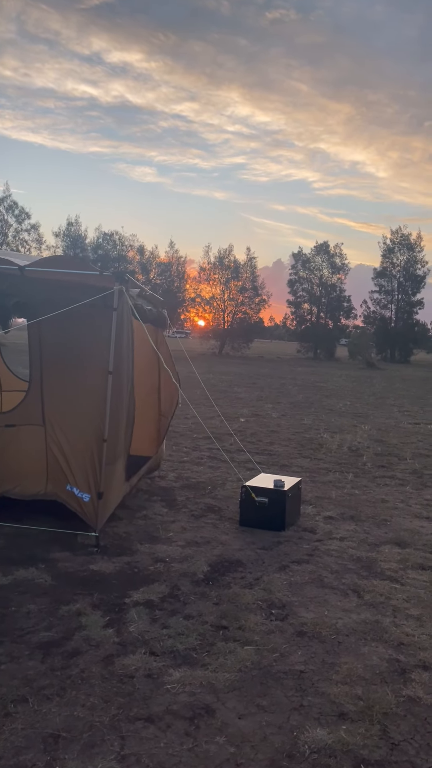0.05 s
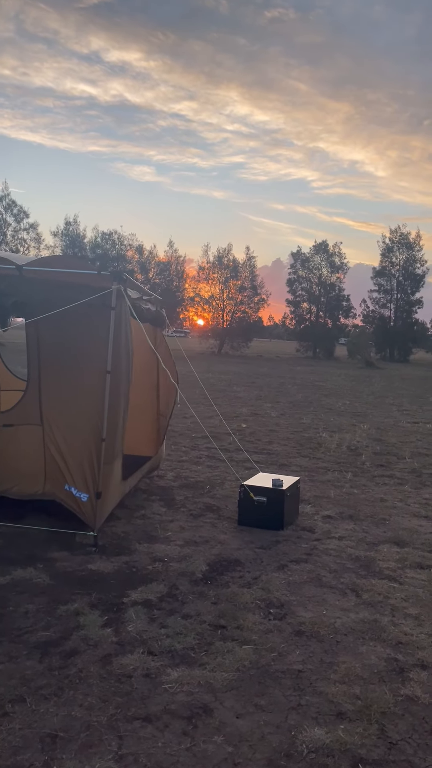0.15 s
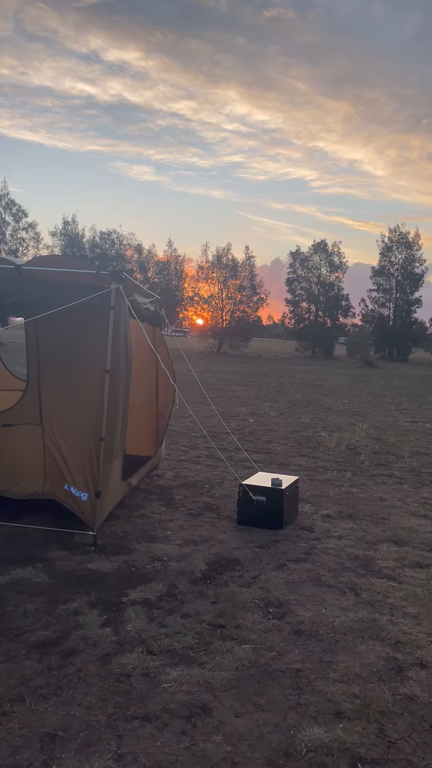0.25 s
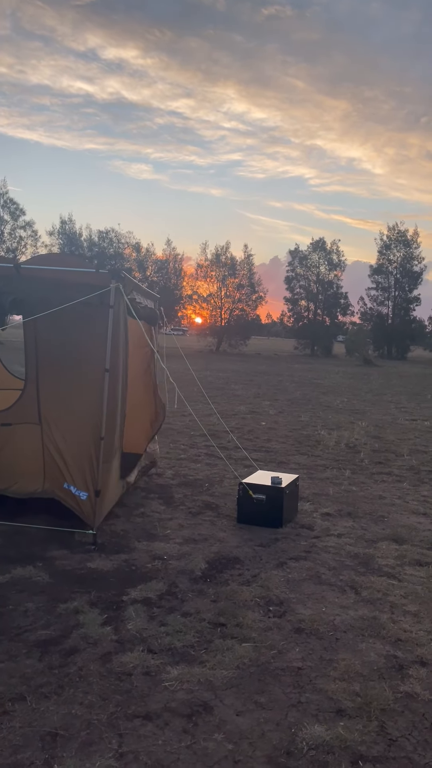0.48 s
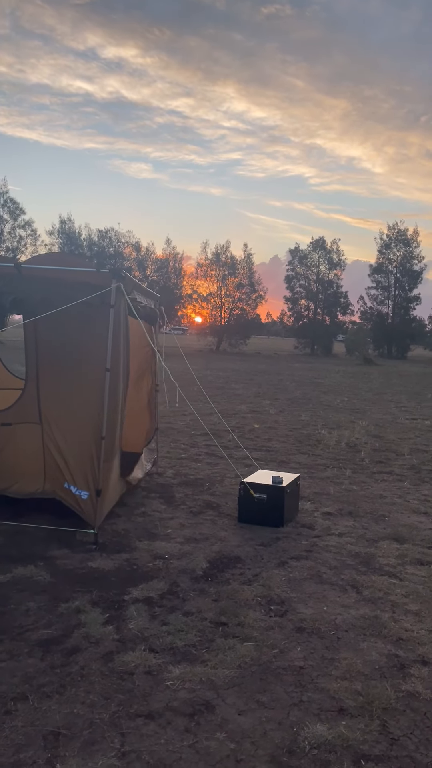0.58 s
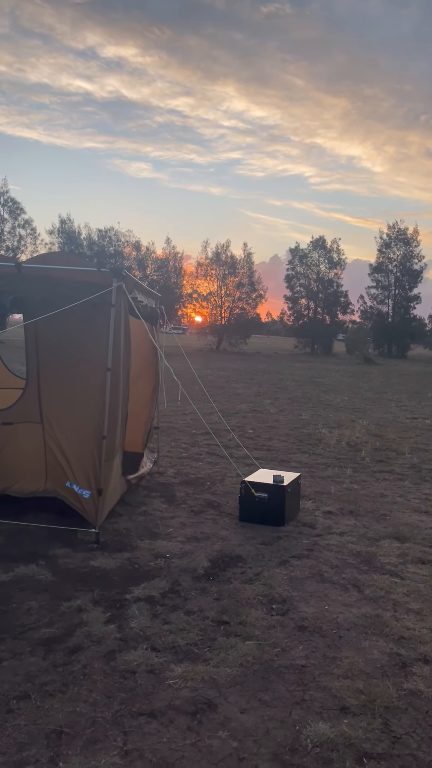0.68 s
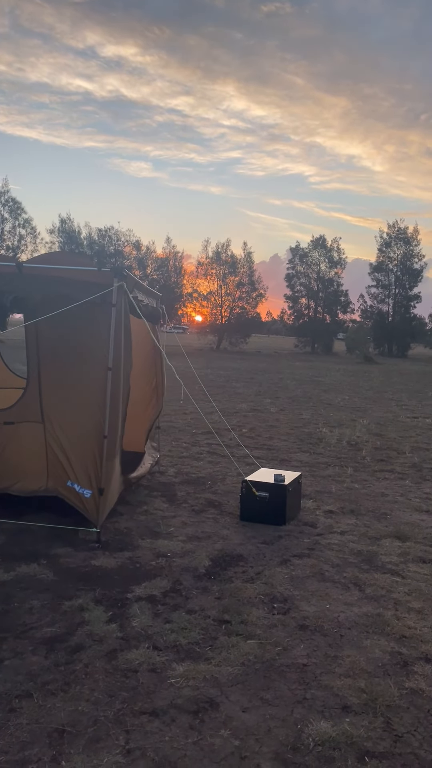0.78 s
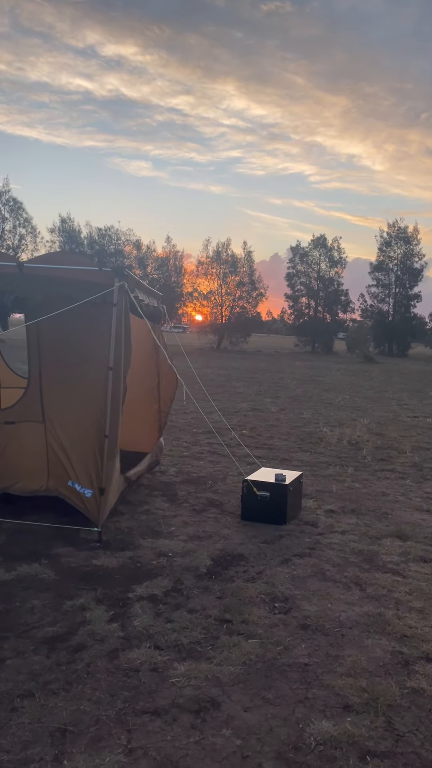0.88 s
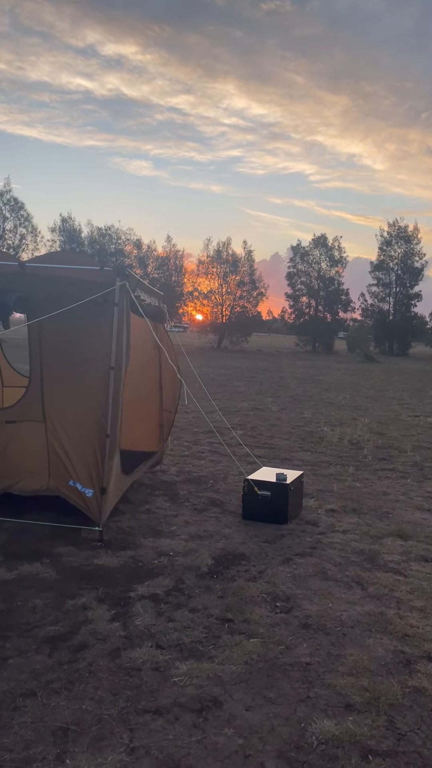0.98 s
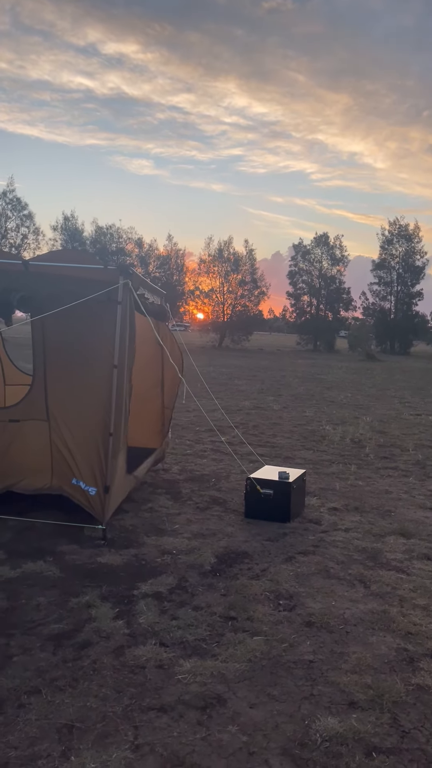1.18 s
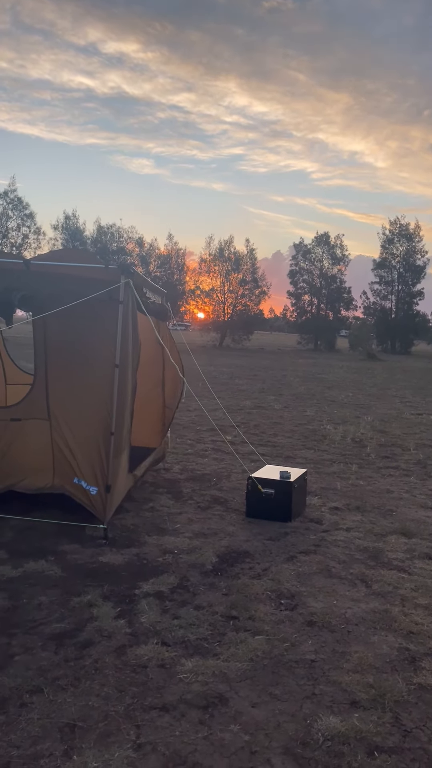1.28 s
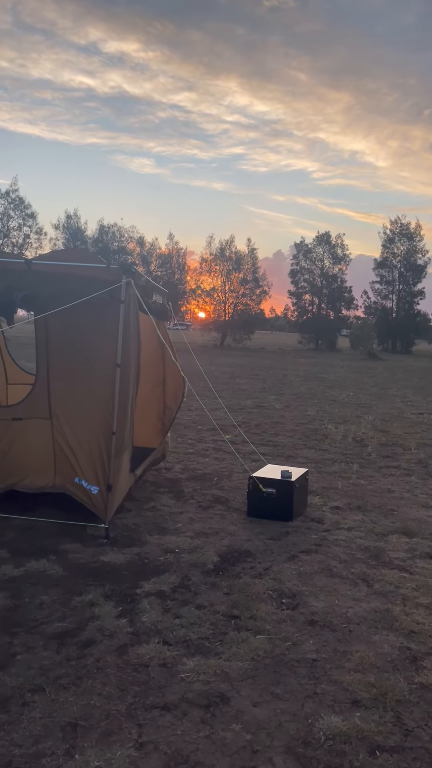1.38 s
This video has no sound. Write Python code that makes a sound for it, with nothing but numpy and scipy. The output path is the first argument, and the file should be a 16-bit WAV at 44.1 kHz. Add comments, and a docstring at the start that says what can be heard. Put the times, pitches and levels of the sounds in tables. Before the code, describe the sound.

A tent wall flaps close by, loudest at about 0.25 seconds, with snapping creases and a low thump. It rustles around 0.55 seconds, flaps again more briefly at 0.8 just after a tiny tick, then rustles lightly until 1.2. Low wind rumbles in gusts throughout, easing after one second. Behind it are a faint distant rush, a soft hiss and a few very faint bird chirps and insect pips.

```python
"""Tent in a light wind at dawn

On an open field a loose tent wall flaps twice: folds ripple through it, creases snap and
the panel pulls taut with a low thump. It rustles in between. Wind rumbles over a far-off rush
and a faint hiss; a bird and an insect call faintly off a tree line, and something ticks once."""
import sys
import numpy as np
from scipy import signal
from scipy.fft import rfft, irfft
from scipy.io import wavfile
from scipy.ndimage import uniform_filter1d

SR = 44100
rng = np.random.default_rng(int(sys.argv[2]) if len(sys.argv) > 2 else 0)


def pcm_store(signal):
    """Save signal as 16-bit PCM."""
    levels = np.round(np.clip(np.atleast_2d(signal), -1, 1) * 32767)
    wavfile.write(sys.argv[1], SR, levels.astype(np.int16).T)


N = 63945


def undb(db):
    return 10 ** (np.asarray(db) / 20)


def unit(x):
    """Scale to rms 1."""
    return x / np.sqrt(np.mean(x ** 2) + 1e-30)


def clock():
    return np.arange(N) / SR


def stereo(mid, side):
    return np.array([mid + side, mid - side])


def colour(x, spectrum):
    """Minimum-phase filter from (freq_hz, gain_db) points; -18 dB/octave above the last."""
    hz, db = np.array(spectrum, float).T
    f = np.maximum(np.arange(N + 1) * SR / (2 * N), 1)
    outline_db = np.interp(np.log(f), np.log(hz), db) - 18 * np.log2(np.maximum(f / hz[-1], 1))
    cepstrum = irfft(np.log(undb(outline_db)))
    cepstrum[1:N] *= 2
    cepstrum[N + 1:] = 0
    return irfft(rfft(np.tile(x, 2)) * np.exp(rfft(cepstrum)))[N:]


def noise(spectrum):
    """Coloured noise, rms 1."""
    return unit(colour(rng.standard_normal(N), spectrum))


def lowpass(x, cutoff_hz):
    return signal.sosfilt(signal.butter(5, cutoff_hz, fs=SR, output="sos"), x)


def even(x, span_s):
    """Hold the local rms at 1."""
    return x / np.sqrt(uniform_filter1d(x ** 2, max(int(span_s * SR), 2)) + 1e-18)


def drift(rate_hz):
    """Smooth random motion, rms 1."""
    hold = max(int(SR / rate_hz), 1)
    steps = np.repeat(rng.standard_normal(N)[:N // hold + 1], hold)
    return unit(uniform_filter1d(steps, hold)[:N])


def burst(peak_s, rise_s, fall_s):
    """Gaussian rise, exponential fall."""
    t = clock() - peak_s
    return np.exp(-np.where(t < 0, (t / rise_s) ** 2, t / fall_s))


def contour(points):
    """Gain curve through (time_s, level_db) points."""
    return undb(np.interp(clock(), *np.array(points).T))


# Hiss spectrum: freq_hz, gain_db
HISS_SPECTRUM = [(1500, -2.5), (2500, 0.5), (3500, 1.5), (4500, 1), (5700, 3.5), (7000, -4), (8500, -0.5),
                 (9800, 3.5), (11800, -5), (12800, -12.5), (13500, -26.5)]

def hiss(level_db=-78, side_db=-1):
    """Faint, wide hiss of the field."""
    return undb(level_db) * stereo(noise(HISS_SPECTRUM), undb(side_db) * noise(HISS_SPECTRUM))


# Rush spectra (mid, side, body): freq_hz, gain_db
RUSH_MID_SPECTRUM = [(100, -14), (250, -22.5), (430, -20.5), (600, -9), (790, 3), (930, -1), (1100, -3),
                     (1330, -6), (1600, -26), (2100, -32.5), (3200, -50.5)]
RUSH_SIDE_SPECTRUM = [(600, -42), (760, -5), (900, -4), (1270, -2), (1440, -7), (1600, -25), (2000, -27),
                      (3000, -28), (4000, -44.5)]
RUSH_BODY_SPECTRUM = [(200, -27), (380, -8.5), (520, -0.5), (750, 1), (1000, -3), (1400, -22)]
# Swell of the body: time_s, level_db
BODY_SWELL = [(0, -75), (.45, -78.5), (.95, -72.5), (1.25, -65), (1.45, -65.5)]

def far_rush(level_db=-59, flicker_db=1.54, side_db=-8.5):
    """Flickering far-off rush, wider toward its top; slowly gains body."""
    mid = noise(RUSH_MID_SPECTRUM) * undb(flicker_db * drift(rate_hz=59.96))
    side = undb(side_db) * noise(RUSH_SIDE_SPECTRUM)
    body = noise(RUSH_BODY_SPECTRUM) * contour(BODY_SWELL)
    return undb(level_db) * stereo(mid, side) + body


def whistle(start_s, length_s, start_hz, end_hz, wobble=0.0063):
    """Phase and envelope of one gliding, slightly unsteady note."""
    progress = np.clip((clock() - start_s) / length_s, 0, 1)
    hz = (start_hz + (end_hz - start_hz) * progress) * (1 + wobble * drift(rate_hz=400))
    return 2 * np.pi * np.cumsum(hz) / SR, np.sin(np.pi * progress)


# Bird calls; bird and insect pips: start_s, length_s, start_hz, end_hz, source_db
BIRD_CALLS = [(0.085, 0.057, 2720, 3360, -74), (.618, .055, 2800, 3350, -87),
              (1.197, .062, 2470, 3186, -81.5)]
THIN_PIPS = [(.667, 0.031, 4340, 4290, -75), (0.805, 0.029, 12200, 11880, -71.5),
             (1.396, 0.022, 12040, 12000, -73)]

def wildlife(octave_db=3.5):
    """A distant bird's rising calls with a strong octave, and thin, nearly level pips."""
    out = 0
    for *note, source_db in BIRD_CALLS:
        phase, envelope = whistle(*note)
        out += undb(source_db) * envelope * (np.sin(phase) + undb(octave_db) * np.sin(2 * phase))
    for *note, source_db in THIN_PIPS:
        phase, envelope = whistle(*note)
        out += undb(source_db) * envelope * np.sin(phase)
    return out


def tree_line(calls, echo_db=2, decay_s=0.017):
    """Trees scatter the calls into a short blur, different on each side."""
    tail = rng.standard_normal((2, N)) * np.exp(-clock() / decay_s)
    tail /= np.sqrt(np.sum(tail ** 2, axis=1, keepdims=True))
    echo = signal.fftconvolve(calls[None], tail, axes=1)[:, :N]
    return calls / 2 + undb(echo_db) * echo


# Tick spectrum: freq_hz, gain_db
TICK_SPECTRUM = [(2000, -23), (4000, -7), (5600, -1), (7000, -3), (10000, 0.5), (12000, -3), (13200, -9),
                 (14000, -14), (16000, -16)]

def tick(peak_s=0.7495, level_db=-58.5, fall_s=0.0019, tail_db=-14.5, tail_s=0.052):
    """One small bright tick, perhaps tent hardware, with a faint tail."""
    rise_s = fall_s / 10
    envelope = burst(peak_s, rise_s, fall_s) + undb(tail_db) * burst(peak_s, rise_s, tail_s)
    return undb(level_db) * envelope * stereo(noise(TICK_SPECTRUM), noise(TICK_SPECTRUM))


# Wind rumble spectrum: freq_hz, gain_db
RUMBLE_SPECTRUM = [(12, -40.5), (26, -18), (42, 4.5), (65, 2), (100, -3), (160, -10), (300, -20.5),
                   (550, -25.5), (1200, -60)]
# Gust strength: time_s, level_db
GUSTS = [(0, -53), (.1, -56), (0.191, -65.5), (.27, -48), (.32, -47), (.37, -60), (.455, -68), (.51, -51),
         (0.682, -55), (.73, -56), (.82, -56), (.87, -57.5), (.94, -56), (1.01, -65), (1.2, -60.5),
         (1.3, -64.5), (1.45, -60)]

def wind():
    """Low buffeting that follows the gusts."""
    return even(noise(RUMBLE_SPECTRUM), span_s=0.07) * contour(GUSTS)


# Rustle spectrum: freq_hz, gain_db
RUSTLE_SPECTRUM = [(300, -26), (550, -9), (700, -9), (830, 6.5), (950, 3), (1100, -18), (1350, -13.5),
                   (1600, -44.5), (2500, -58)]
# Light rustles: peak_s, level_db
CREASE_RUSTLES = [(0.116, -52), (0.185, -51.5), (0.522, -46), (0.559, -45.5), (.574, -46.5), (0.584, -55),
                  (.613, -50), (.947, -53), (1.046, -47.5), (1.12, -48.5), (1.18, -50.5)]

def rustles(rise_s=0.0029, fall_s=0.0059):
    """Creases rustle as the wall refills."""
    envelope = sum(undb(db) * burst(peak_s, rise_s, fall_s) for peak_s, db in CREASE_RUSTLES)
    return envelope * even(noise(RUSTLE_SPECTRUM), span_s=0.015)


# Snap spectrum: freq_hz, gain_db
SNAP_SPECTRUM = [(200, -10), (600, 2.5), (1000, 3.5), (1500, -9.5), (2100, -17), (2700, -25.5), (4000, -18),
                 (5000, -42)]
# Sharp snaps: peak_s, level_db, cutoff_hz
CREASE_SNAPS = [(.2245, -45, 2400), (0.234, -41, 2220), (0.2397, -40, 2400), (0.2573, -36, 4500),
                (0.274, -38, 2440), (.292, -44, 1750), (0.7934, -46, 1880), (.8075, -42, 1860)]

def snaps(fall_s=0.0034):
    """Creases snap during the big flaps."""
    out = 0
    for peak_s, level_db, cutoff_hz in CREASE_SNAPS:
        crack = even(lowpass(noise(SNAP_SPECTRUM), cutoff_hz), span_s=0.0059)
        out += undb(level_db) * burst(peak_s, fall_s / 5, fall_s) * crack
    return out


# Wall thumps: peak_s, level_db, pitch_hz
WALL_THUMPS = [(0.255, -33, 128), (.298, -37, 89), (.513, -45.5, 81), (0.561, -45, 89), (.801, -35.5, 105),
               (.818, -39, 81)]

def thumps(rise_s=0.002, fall_s=0.0094):
    """The panel pulls taut and swings for a cycle or two."""
    out = 0
    for peak_s, level_db, pitch_hz in WALL_THUMPS:
        swing = np.sin(2 * np.pi * pitch_hz * (clock() - peak_s))
        out += undb(level_db) * burst(peak_s, rise_s, fall_s) * swing
    return out


# Rippling cloth spectrum: freq_hz, gain_db
CLOTH_SPECTRUM = [(40, -20), (80, -1), (130, -3.5), (230, 0), (330, -5), (600, -7.5), (1100, -15.5),
                  (1500, -21), (2100, -32.5), (4000, -39), (8000, -31)]
# Wall flaps: peak_s, rise_s, fall_s, level_db, cutoff_hz
WALL_FLAPS = [(0.231, 0.011, 0.014, -43, 2300), (.259, 0.02, 0.014, -33, 1910),
              (.297, 0.019, .014, -45, 614), (0.801, 0.0066, .011, -37.5, 740),
              (.003, 0.014, 0.015, -51.5, 338), (.092, 0.01, 0.0079, -55, 330),
              (.765, 0.057, 0.023, -56.5, 707), (0.931, 0.022, 0.0052, -59, 275),
              (1.41, .04, 0.03, -63.5, 610)]

def flaps(ripple_hz=171.1, jitter=0.3, scatter_db=2.5, noise_db=-4, swing_limit_rms=1.2):
    """Folds run through the wall as uneven soft pulses, with cloth noise between them."""
    out = 0
    for peak_s, rise_s, fall_s, level_db, cutoff_hz in WALL_FLAPS:
        gap, size, polarity = rng.standard_normal((600, 3)).T
        fold_s = np.cumsum(np.exp(jitter * gap)) / ripple_hz
        heights = undb(scatter_db * size) * np.sign(polarity)
        pulses = np.bincount((fold_s * SR).astype(int), heights, N)[:N]
        cloth = unit(colour(pulses, CLOTH_SPECTRUM)) + undb(noise_db) * noise(CLOTH_SPECTRUM)
        swing = np.tanh(unit(cloth) / swing_limit_rms)  # taut cloth limits its swing
        ripple = even(lowpass(swing, cutoff_hz), span_s=0.011)
        out += undb(level_db) * burst(peak_s, rise_s, fall_s) * ripple
    return out


def scene(left_lag_s=0.00008):
    """The tent over the field; its sound reaches the left microphone port later."""
    tent = flaps() + thumps() + snaps() + rustles()
    tent_left = np.interp(clock() - left_lag_s, clock(), tent)
    return np.array([tent_left, tent]) + wind() + tree_line(wildlife()) + far_rush() + hiss() + tick()


def record(dry, notch_hz=7583, notch_width_hz=410, notch_db=-30, mono_below_hz=990, top_hz=15750):
    """Narrow treble notch, bass folded to mono, steep top cut."""
    f = np.arange(N + 1) * SR / (2 * N)
    notch = undb(notch_db * np.exp(-((f - notch_hz) / notch_width_hz) ** 2))
    left, right = rfft(dry, 2 * N) * notch
    width = 1 - 1 / (1 + (f / mono_below_hz) ** 6)
    heard = irfft(stereo(left + right, width * (left - right)) / 2)[:, :N]
    top_cut = signal.ellip(8, 0.2, 70, top_hz, fs=SR, output="sos")
    return signal.sosfilt(top_cut, heard)


dry = scene()
out = record(dry)
pcm_store(out)
```